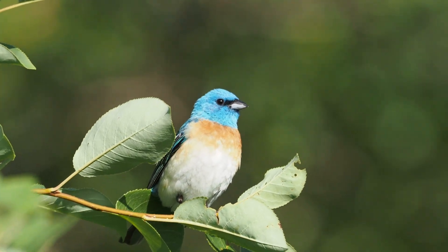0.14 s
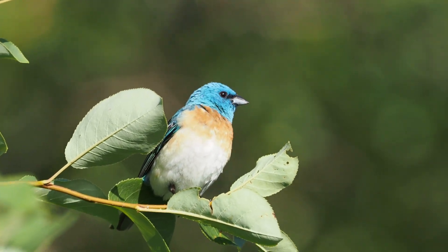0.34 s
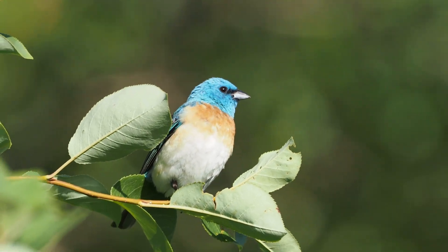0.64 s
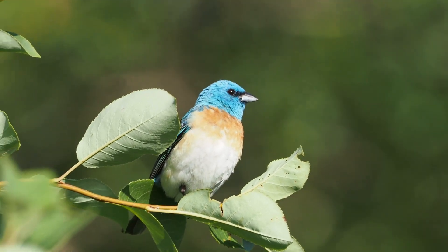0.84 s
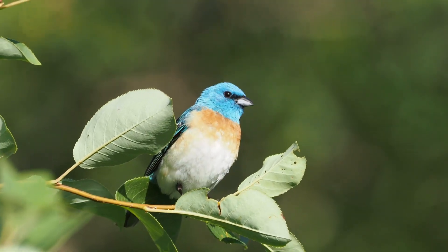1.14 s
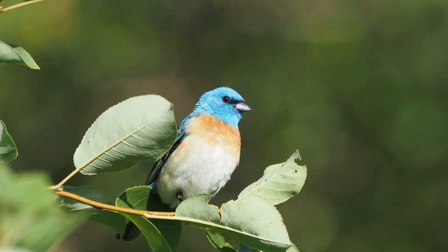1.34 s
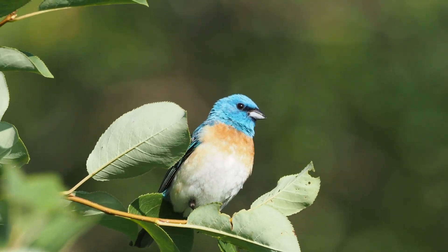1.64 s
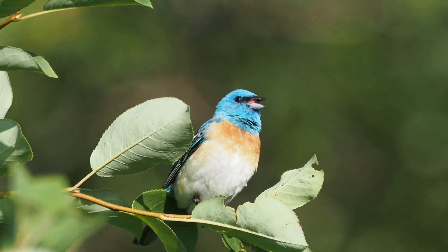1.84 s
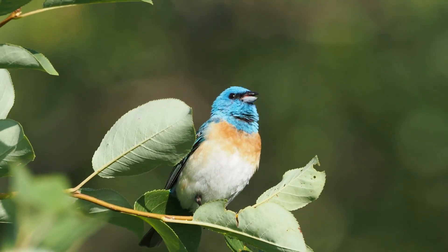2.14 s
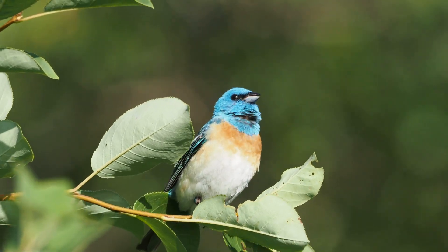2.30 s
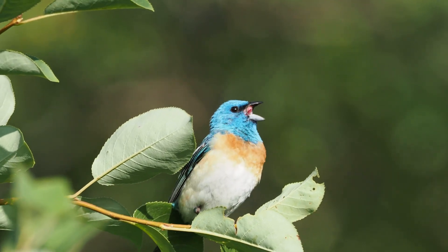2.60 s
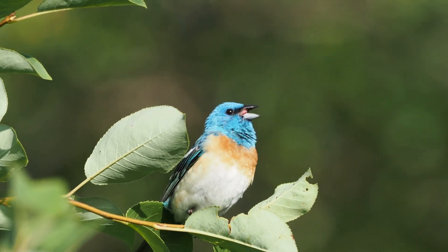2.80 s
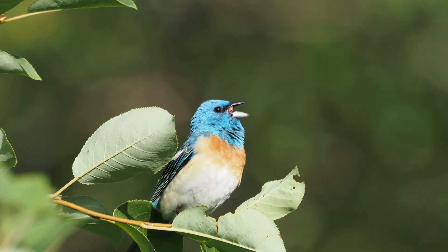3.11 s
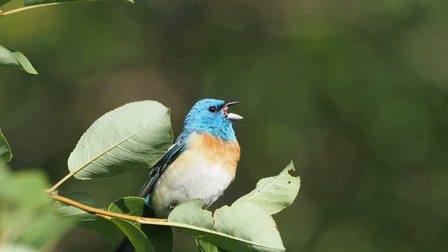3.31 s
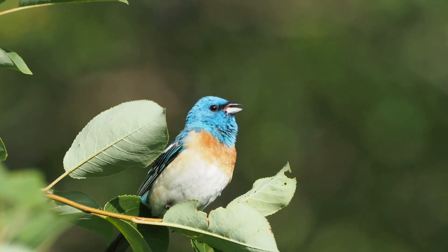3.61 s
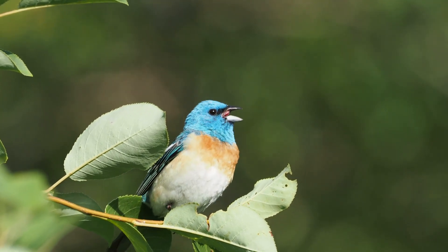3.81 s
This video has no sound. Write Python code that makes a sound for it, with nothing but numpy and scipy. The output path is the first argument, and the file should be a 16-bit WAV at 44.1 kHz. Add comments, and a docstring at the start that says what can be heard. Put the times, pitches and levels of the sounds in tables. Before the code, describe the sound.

A small songbird sings one quick, varied song of whistles, chirps and buzzes over low rumble

```python
"""Outdoors among bushes and trees, a bunting sings one song: three falling slurs, two rising whistles,
three stuttered chirps, a third whistle, a warble, a buzz, three peaked notes and a last thin buzz.
Each note is one gliding tone with faint overtones and rasp; leaves, bush and far trees echo it.
Bird, outdoor air (shaped noise) and a low hum (a sine) are on the right;
the left has only a dull, hollow rumble of shaped noise."""
import sys
import numpy as np
from scipy import signal
from scipy.fft import rfft, irfft, next_fast_len
from scipy.io import wavfile
from scipy.ndimage import uniform_filter1d

SR = 44100
rng = np.random.default_rng(int(sys.argv[2]) if len(sys.argv) > 2 else 0)


def store_pcm(level_fs):
    """Save levels as 16-bit WAV."""
    pcm = np.round(np.clip(level_fs, -1, 1) * 32767).astype(np.int16)
    wavfile.write(sys.argv[1], SR, np.atleast_2d(pcm).T)


N = 174195  # length of the scene [samples]


def amp(db):
    """Decibels to gain."""
    return 10 ** (np.asarray(db) / 20)


def read(points, hz):
    """Interpolates a spectrum's level at hz on a log-frequency axis."""
    f, level_db = np.transpose(points)
    return np.interp(np.log(hz + 1), np.log(f + 1), level_db)


def noise(spectrum):
    """Steady Gaussian noise, shaped in frequency to the given power density."""
    white = rfft(rng.standard_normal(N))
    gain = amp(read(spectrum, np.fft.rfftfreq(N, 1 / SR)))
    return irfft(white * gain, N) * np.sqrt(SR / 2)


def hollow_rumble():
    """Dull noise whose broad humps around 364 Hz and 595-675 Hz sound hollow."""
    # Rumble spectrum: (frequency [Hz], density [dB per Hz])
    rumble_density = [(15, -59), (48, -64), (65, -76), (90, -76.5), (200, -75.5), (270, -72.5), (305, -68),
                      (335, -67), (364, -62), (395, -66), (425, -73), (465, -83.5), (520, -85),
                      (595, -65.5), (635, -67.5), (675, -65), (760, -73), (850, -82), (1000, -84),
                      (1100, -84.5), (1250, -88.5), (1350, -92), (1500, -92.5), (1850, -102), (2700, -97),
                      (4000, -105), (7000, -107), (10300, -108), (11300, -113), (16000, -110)]
    return noise(rumble_density)


def outdoor_air():
    """Steady air noise, strongest in the lows and fading towards the treble."""
    # Air spectrum: (frequency [Hz], density [dB per Hz])
    air_density = [(15, -64), (30, -60.5), (45, -63), (70, -65.5), (100, -68), (125, -72), (200, -74),
                   (480, -80), (650, -75), (830, -80.5), (1000, -75), (1400, -81), (1900, -87.5),
                   (2600, -83.5), (3500, -88.5), (4500, -96.5), (5600, -96.5), (6400, -102), (7200, -100),
                   (8100, -107), (10300, -107), (11200, -113), (13000, -109), (16000, -112)]
    return noise(air_density)


def hum():
    """A deep, steady sine with a random starting phase."""
    pitch_hz, rms_db = 43.9, -34.4
    cycles = pitch_hz * np.arange(N) / SR + rng.random()
    return np.sqrt(2) * amp(rms_db) * np.sin(2 * np.pi * cycles)


def drift(size, rate_hz):
    """Smooth random motion of unit spread: noise under a Gaussian roll-off set by rate_hz."""
    n = next_fast_len(max(size, 8192))
    rolloff = np.exp(-(np.fft.rfftfreq(n, 1 / SR) / rate_hz) ** 2)
    motion = irfft(rfft(rng.standard_normal(n)) * rolloff, n)
    return (motion / motion.std())[:size]


def syrinx(hz, level_db, rasp_db):
    """One unsteady tone with soft ends, two faint overtones and a band of rasp that follows its pitch."""
    jitter, shimmer_db, unsteady_hz = .006, .6, 450  # pitch spread (share), level spread, speed of both
    rasp_width_hz, rasp_above_hz = 1100, 450  # noise band, centred above the tone
    edge_s = .0017  # fade at each end
    # Overtones as the microphone hears them, weak around 8-11 kHz and stronger around 12-14 kHz:
    # (overtone frequency [Hz], level relative to the tone [dB])
    second = [(5000, -50), (7800, -48), (8700, -42), (10500, -42), (11600, -39), (12600, -26.5),
              (14000, -26), (15500, -31)]
    third = [(9000, -49), (11000, -41), (13000, -33.5), (15500, -36.5)]

    size = len(hz)
    t = np.arange(size) / SR
    hz = uniform_filter1d(hz, size=80)  # rounds the corners of the glide
    hz = hz * (1 + jitter * drift(size, unsteady_hz))
    phase = 2 * np.pi * np.cumsum(hz) / SR

    rasp = drift(size, rasp_width_hz) + 1j * drift(size, rasp_width_hz)
    rasp = rasp * np.exp(2j * np.pi * rasp_above_hz * t) / np.sqrt(2)
    vibration = np.exp(1j * phase) * (1 + amp(rasp_db) * rasp)

    tone = vibration.imag
    for k, colour in enumerate([second, third], 2):
        below_nyquist = k * hz < SR / 2
        tone = tone + amp(read(colour, k * hz)) * below_nyquist * (vibration ** k).imag

    to_nearest_end = np.minimum(t, t[::-1])
    ends = np.sin(np.pi / 2 * np.minimum(to_nearest_end / edge_s, 1)) ** 2
    level = amp(level_db + shimmer_db * drift(size, unsteady_hz))
    return np.sqrt(2) * tone * ends * level


def note(shape, length_s, factor, level_db):
    """One sung note: a drawn glide of pitch and level, stretched, transposed and scaled."""
    # Note shapes by name: (share of the note's length, pitch before transposing [Hz],
    # level relative to the note's own [dB])
    shapes = { "fall": [(0, 5800, -32), (.11, 5880, -19), (.21, 5550, -3.5), (.4, 5050, -1),
              (.59, 4560, -0.5), (.78, 3850, -10), (.92, 3280, -10.5), (1, 3150, -6)],
              "slide": [(0, 5330, -8), (.17, 5100, 0), (.3, 4830, -4), (.42, 4650, 0), (.8, 4230, 0),
              (1, 3950, -6)], "bend": [(0, 5480, -24), (.17, 5330, -9), (.3, 5150, 0), (.44, 4950, -3),
              (.57, 4620, 0), (.73, 4100, -4), (.83, 3650, -11), (1, 3200, -10)], "hook": [(0, 3200, -12),
              (.28, 3950, -7), (.56, 4950, -1), (.75, 5250, 2.5), (1, 5500, -22)], "pip": [(0, 7080, -19),
              (.3, 6980, -7), (.55, 6730, -4), (.8, 6540, -0.5), (1, 6380, -5)], "arch": [(0, 2950, -7),
              (.3, 3330, -4.5), (.6, 3250, 1.5), (.82, 2800, -8), (1, 2350, -4)], "rise": [(0, 2500, -22),
              (.06, 3000, -13), (.13, 3500, -8), (.35, 3700, -6), (.6, 3950, -5), (.8, 4230, 2),
              (.93, 4340, -3), (1, 4300, -11)], "tick": [(0, 4650, -10), (.35, 5150, -0.5),
              (.72, 5600, -2.5), (1, 5650, -7)], "flick": [(0, 3900, -15), (.3, 4650, -10), (.55, 5220, -1),
              (.8, 5500, -2.5), (1, 5520, -9)], "whip": [(0, 4100, -15), (.28, 4900, -3), (.5, 5500, -1),
              (.7, 6700, -13), (1, 9000, -31)], "drop": [(0, 8300, -25), (.17, 7050, -6), (.3, 6400, -0.5),
              (.48, 6350, -7), (.66, 6650, -3), (1, 6600, -1)], "snap": [(0, 6000, -15), (.32, 6200, 2),
              (.48, 6600, -25), (.63, 7050, -7), (.8, 5600, 6.5), (.92, 3900, -8), (1, 3500, -17)],
              "lilt": [(0, 4400, -8), (.35, 4980, -3), (.75, 5130, 0), (1, 5200, -5)],
              "blip": [(0, 6270, -5), (.6, 6130, 0), (1, 5990, -2)], "dome": [(0, 3600, -16),
              (.15, 4600, -8), (.3, 5550, -1), (.48, 5720, 0), (.7, 5650, -4), (.84, 5100, -10),
              (1, 4000, -12)], "wave": [(0, 3850, -12), (.15, 4500, -8.5), (.3, 5250, -1.5), (.52, 5550, 1),
              (.7, 5800, -6), (.85, 5200, -10), (1, 3950, -6)], "swell": [(0, 3800, -11), (.17, 4500, -5),
              (.43, 5300, 3), (.7, 5850, -6.5), (.85, 4950, -10), (1, 4200, -13)], "sigh": [(0, 4200, -2.5),
              (.08, 4650, -1), (.18, 5300, 0), (.23, 5200, -12), (.3, 4350, -5), (.5, 3680, -10),
              (.76, 3250, -6.5), (.9, 3020, -7.5), (1, 2900, -29)], "peak": [(0, 3050, -13),
              (.23, 3600, -12), (.36, 4300, 0.5), (.46, 5350, -4.5), (.56, 4850, 0), (.69, 4000, -5),
              (.87, 3530, -6.5), (1, 3080, -8)], }
    # Rasp of the harsher notes by shape name: level relative to the tone [dB]
    harsh_rasp = {"whip": -12, "snap": -15, "drop": -22, "flick": -27, "wave": -32}
    share, hz, db = np.transpose(shapes[shape])
    u = np.linspace(0, 1, round(length_s * SR))
    glide_hz = factor * np.interp(u, share, hz)
    rasp_db = harsh_rasp.get(shape, -42)  # the other notes are nearly clean
    return syrinx(glide_hz, level_db + np.interp(u, share, db), rasp_db)


def buzz(rows):
    """A high tone shaken quickly in pitch, dipping in level at each pitch crest."""
    shakes_per_s, sharpness = 85.6, 1.4  # higher sharpness narrows the crests
    s, *controls = np.transpose(rows)
    t = np.arange(s[0], s[-1], 1 / SR)
    hz, swing_hz, db, dip_db, rasp_db = [np.interp(t, s, c) for c in controls]
    crest = abs(np.cos(np.pi * shakes_per_s * (t - s[0]))) ** (2 * sharpness)
    return syrinx(hz + swing_hz * (2 * crest - 1), db - dip_db * crest, rasp_db)


def add(mix, s, sound):
    """Mixes a sound in at time s, cut off where the mix ends."""
    part = mix[round(s * SR):][:len(sound)]
    part += sound[:len(part)]


def bird():
    """The whole song, dry: every note and both buzzes from the one voice."""
    # Notes: (shape name, start [s], length [s], pitch factor, level [dB])
    song = [ ("slide", 1.600, .074, 1.0, -54), ("lilt", 1.708, .021, 1.0, -45.5),
            ("blip", 1.753, .019, 1.0, -47.5), ("bend", 1.840, .104, 1.0, -33),
            ("hook", 1.943, .025, 1.0, -34.5), ("pip", 1.974, .048, .995, -38),
            ("fall", 2.079, .105, 1.0, -26), ("hook", 2.184, .026, 1.0, -30.5),
            ("pip", 2.214, .047, 1.0, -34), ("arch", 2.325, .020, .93, -38.5),
            ("rise", 2.354, .094, .975, -28.5), ("arch", 2.486, .021, 1.0, -31),
            ("rise", 2.512, .071, 1.0, -26), ("arch", 2.860, .024, 1.02, -31),
            ("rise", 2.887, .066, 1.035, -26.5), ("tick", 2.6145, .012, 1.03, -27.5),
            ("flick", 2.624, .013, 1.01, -24), ("whip", 2.636, .015, 1.0, -21),
            ("drop", 2.654, .020, 1.04, -31), ("tick", 2.705, .010, 1.02, -28.5),
            ("flick", 2.715, .011, 1.0, -23), ("drop", 2.729, .023, .99, -29.5),
            ("tick", 2.783, .011, .96, -29), ("flick", 2.793, .014, .975, -22.5),
            ("drop", 2.809, .019, 1.01, -31), ("snap", 3.011, .025, 1.0, -30),
            ("dome", 3.036, .031, 1.0, -23), ("wave", 3.066, .030, 1.0, -21.5),
            ("swell", 3.097, .030, 1.0, -23.5), ("sigh", 3.127, .108, 1.0, -24.5),
            ("peak", 3.530, .044, 1.0, -26.5), ("peak", 3.601, .041, .99, -28),
            ("peak", 3.671, .043, .99, -29), ]
    # Two buzzes, each with rows of: (time [s], centre pitch [Hz], pitch swing either way [Hz],
    # level [dB], dip at each pitch crest [dB], rasp relative to the tone [dB])
    buzzes = [
        [(3.3245, 6200, 60, -38, 14, -34), (3.342, 6290, 190, -30, 19, -32), (3.385, 6300, 270, -29, 9, -30),
         (3.42, 6280, 290, -28.5, 7, -27), (3.445, 6000, 250, -30.5, 5, -28), (3.472, 5870, 280, -27, 7, -30),
         (3.483, 5900, 250, -37, 6, -30)],
        [(3.7495, 6400, 200, -48, 6, -15), (3.766, 6500, 450, -34.5, 8, -12), (3.788, 6650, 450, -36, 5, -13),
         (3.806, 6950, 400, -34.5, 2, -19), (3.832, 6800, 350, -36.5, 2, -20), (3.853, 6550, 350, -41, 2, -20),
         (3.861, 6350, 300, -44, 3, -19)],
    ]
    voice = np.zeros(N)
    for shape, start_s, *rest in song:
        add(voice, start_s, note(shape, *rest))
    for rows in buzzes:
        add(voice, rows[0][0], buzz(rows))
    return voice


def surroundings(x):
    """Direct sound plus single leaf echoes, a short scatter in the bush and a long tail from the trees."""
    bush_db, bush_t60_s = -19.5, .16
    trees_db, trees_t60_s, trees_onset_s = -16, .85, .025
    # Echoes from leaves close by: (delay [s], level [dB])
    leaves = [(.0021, -15.5), (.0047, -16), (.0083, -17.5), (.0135, -22), (.021, -21)]
    t = np.arange(SR) / SR
    bush = rng.standard_normal(SR) * amp(-60 * t / bush_t60_s)
    trees = rng.standard_normal(SR) * amp(-60 * t / trees_t60_s)
    trees = trees * (1 - np.exp(-t / trees_onset_s))  # far trees answer gradually
    echo = amp(bush_db) * bush / np.linalg.norm(bush)
    echo = echo + amp(trees_db) * trees / np.linalg.norm(trees)
    for delay_s, db in leaves:
        add(echo, delay_s, amp([db]))
    return x + signal.fftconvolve(x, echo)[:N]


def scene():
    """Hollow rumble on the left; air, hum and the echoing bird on the right."""
    left = hollow_rumble()
    right = outdoor_air() + hum() + surroundings(bird())
    return np.array([left, right])


def record(dry):
    """The recorder's band limit: a steep low-pass on both channels."""
    cutoff_hz = 15800
    lowpass = signal.firwin(511, cutoff_hz, window=("kaiser", 9), fs=SR)
    return signal.oaconvolve(dry, lowpass[None], "same")


dry = scene()
out = record(dry)
store_pcm(out)
```